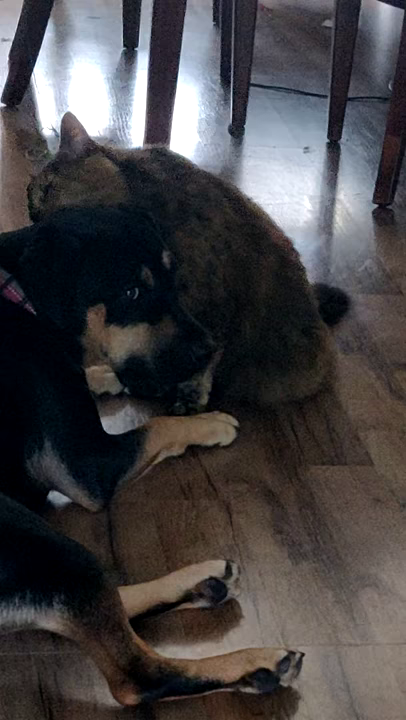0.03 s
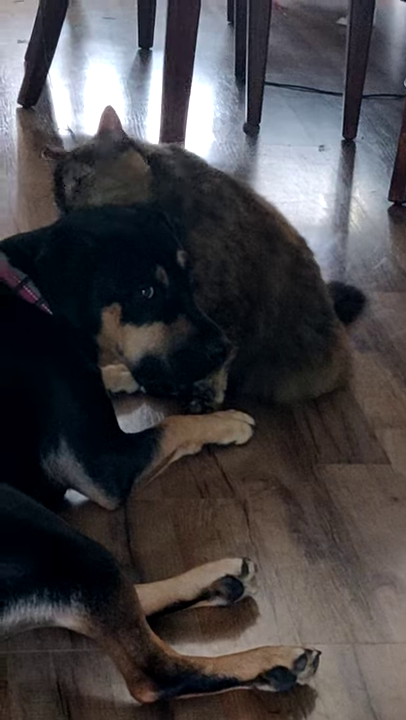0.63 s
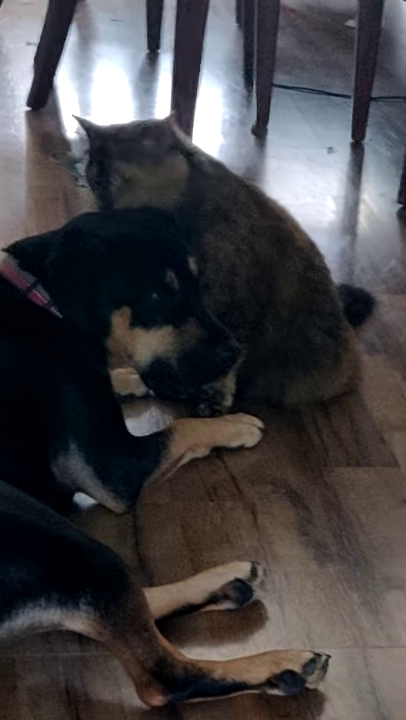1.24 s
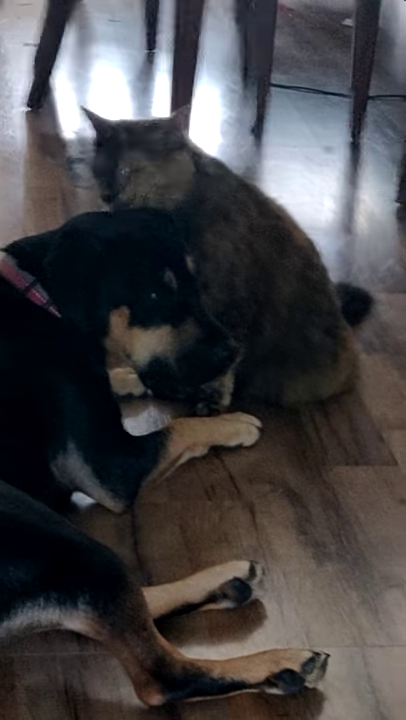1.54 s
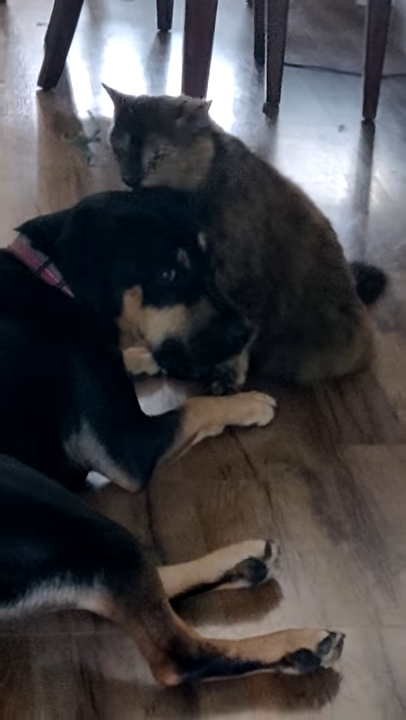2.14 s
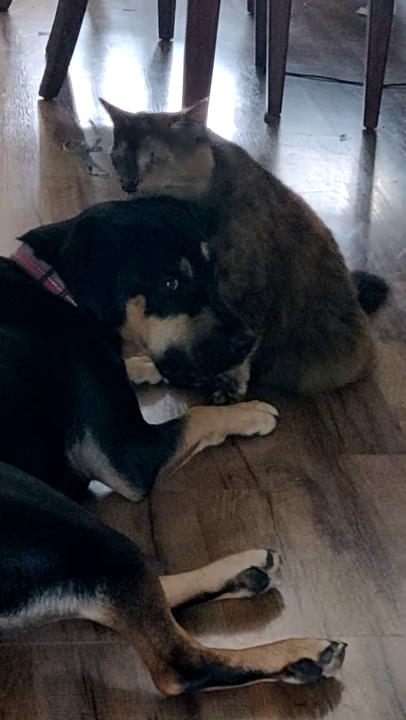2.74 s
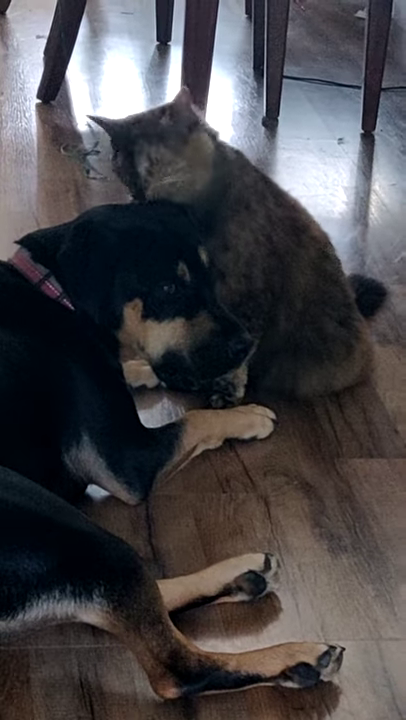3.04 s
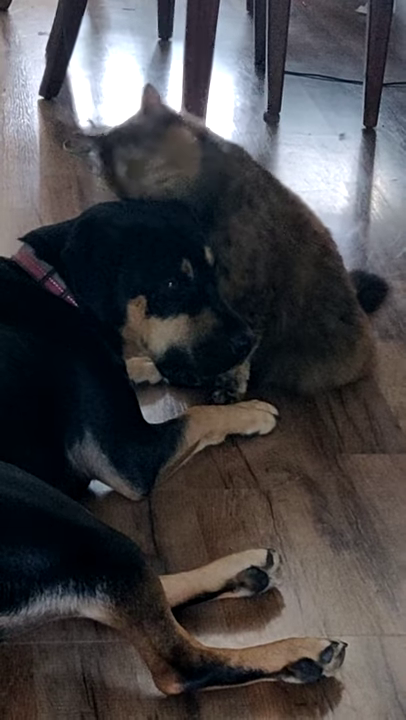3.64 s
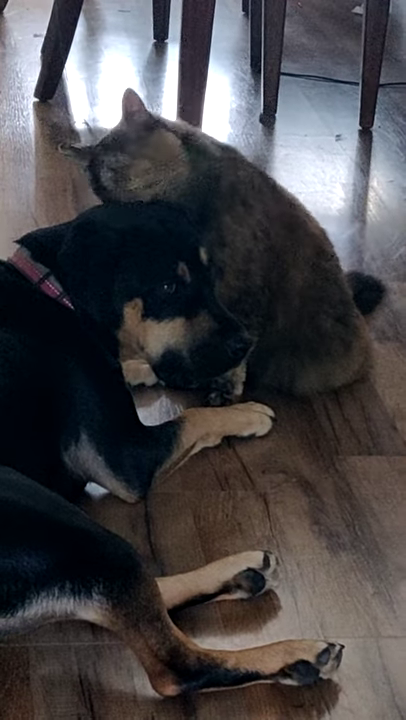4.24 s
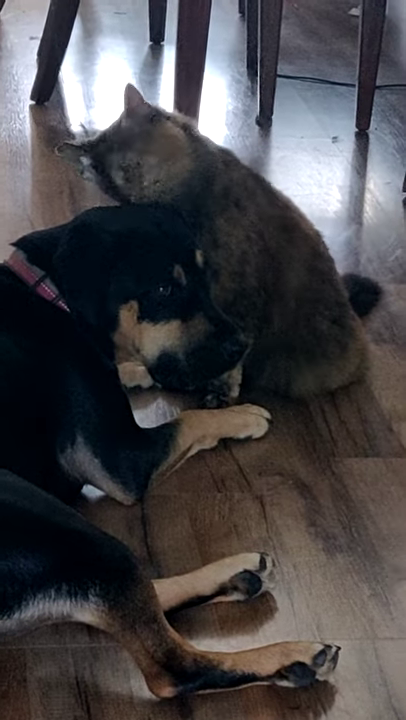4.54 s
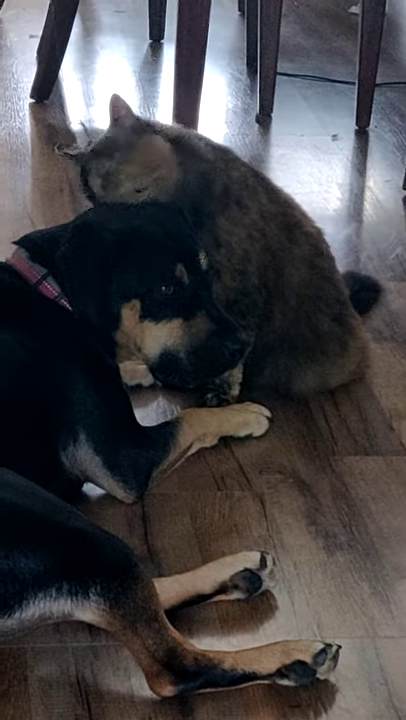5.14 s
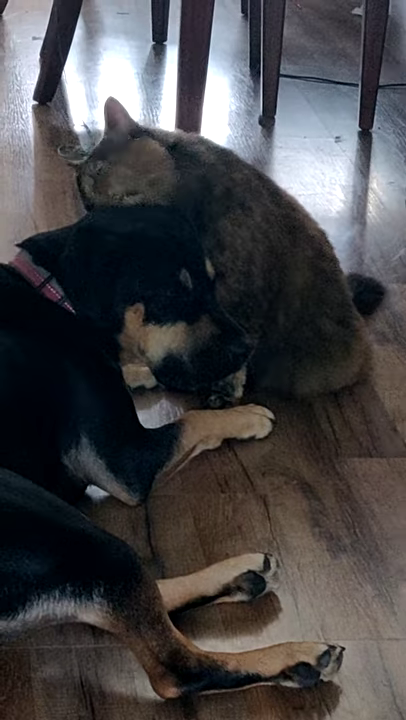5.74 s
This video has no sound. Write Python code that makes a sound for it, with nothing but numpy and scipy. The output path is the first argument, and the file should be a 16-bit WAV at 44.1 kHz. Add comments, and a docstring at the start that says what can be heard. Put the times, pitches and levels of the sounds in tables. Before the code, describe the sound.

A quiet room fades in at about 0.2 seconds, heard through a hand-held phone: rumbling ventilation, a faint wavering fan whine and microphone hiss, all of which stay to the end. From about 0.4 to 0.6 seconds a short low buzz shakes the left side. From around 0.9 seconds a cat and a dog shift on the wooden floor, slightly to the left, making very soft, brief scuffs that cluster between 1.6 and 2.4 seconds, with another near 3.1. Over the same stretch, until about 3.6 seconds, fingers lightly brush the phone on the right, and the grip changes with a soft, dull swell near 1.7 seconds. A claw taps the boards once with a scuff at 3.6 seconds. A last scuff follows at about 4.7 seconds, and one tiny dry tick sounds near 5.4 seconds over the steady rumble.

```python
"""A cat and a dog rest on a wooden floor in a quiet room, heard through a hand-held phone.
The sound fades in on rumbling ventilation, a faint fan whine and microphone hiss, which all stay.
As it does, a short low buzz shakes the left microphone opening. From about one second on, the
animals shift with soft scuffs, fingers brush the phone and the hand changes its grip.
Later a claw taps the floor, a last scuff follows, and there is one tiny tick near the end."""
import sys
import numpy as np
from scipy.fft import rfft, irfft, next_fast_len
from scipy.io import wavfile
from scipy.ndimage import map_coordinates

SR = 44100
rng = np.random.default_rng(int(sys.argv[2]) if len(sys.argv) > 2 else 0)


def bounce(signal):
    """Save signal as a 16-bit WAV file at the path given by the first command-line argument."""
    frames = np.transpose(np.atleast_2d(signal))
    limited = np.clip(frames, -1, 1)
    pcm = np.round(limited * 32767).astype(np.int16)
    wavfile.write(sys.argv[1], SR, pcm)


N = 259308
ANIMALS_LEFT_DB = 3.5  # the animals lie a little to the left


# The tone of rubbing on wood: pitch_hz, level_db
SCRAPE_TONE = [(500, -13), (2000, 17.5), (4000, 0), (6000, -5), (8000, -20), (15000, -24)]
# Each scuff: start_s, level_db, decay_s, pitch_hz, width_hz, high_ring_db
PAW_SCUFFS = [(0.868, -66, .008, 5700, 450, 16), (1.036, -69, .018, 5950, 450, 14),
              (1.643, -63.5, .036, 4600, 1500, 12), (1.868, -62, .012, 3700, 900, 3),
              (1.977, -63, .015, 4000, 700, 0), (2.345, -69, .018, 6100, 450, 16),
              (2.390, -63.5, 0.025, 2800, 1100, 21), (3.077, -68, .018, 6100, 450, 14),
              (3.597, -62.5, 0.075, 3700, 450, 14), (4.744, -61, 0.05, 2700, 1800, 11),
              (4.756, -65, 0.05, 4640, 700, 5)]

def scuffs(rise_s=0.0044, grain_db=1.5, ring_db=14, high_ring_hz=5840, high_ring_width_hz=950):
    """Paws and fur catch on the boards: a grainy rub with one strong pitch and a thin, high ring."""
    out = np.zeros((2, N))
    for start, db, decay, pitch, width, high_ring_db in PAW_SCUFFS:
        stroke = envelope(start, start, rise_s, decay)
        high_ring = lambda hz: amp(high_ring_db) * resonance(hz, high_ring_hz, high_ring_width_hz) ** 2
        ring = lambda hz: amp(ring_db) * resonance(hz, pitch, width) ** 2
        rub = noise(lambda hz: tone_curve(SCRAPE_TONE, hz) * (1 + high_ring(hz) + ring(hz)), channels=2)
        grain = amp(grain_db * wobble(300))
        out += amp(db) * stroke * unit(rub * grain)
    return pan(ANIMALS_LEFT_DB) * out


# The pitches a claw rings with: pitch_hz, width_hz, level_db
CLAW_RINGS = [(2100, 600, -7), (3600, 500, 0), (5600, 800, 1.5)]
# When the claw lands: start_s, level_db
CLAW_TAPS = [(3.5928, -55)]

def claw_tap(rise_s=0.0008, decay_s=0.005):
    """A claw tip strikes the boards once and rings for a few milliseconds."""
    tone = lambda hz: sum(amp(db) * resonance(hz, pitch, width) ** 2 for pitch, width, db in CLAW_RINGS)
    out = np.zeros((2, N))
    for start, db in CLAW_TAPS:
        ring = unit(noise(tone, channels=2))
        out += amp(db) * envelope(start, start, rise_s, decay_s) * ring
    return pan(ANIMALS_LEFT_DB) * out


# The tone of skin on the phone's case: pitch_hz, level_db
SKIN_TONE = [(1000, -2), (3500, 5.5), (7000, 1), (9700, 3), (12000, 1.5), (15500, 6.5)]
# Each finger stroke: start_s, length_s, relative_level_db, brightness_db_per_octave
FINGER_STROKES = [(0.93, .02, -69, 4), (1.040, .012, -61, 4), (1.635, .07, -62.5, 4), (1.75, 0.082, -63, 3),
                  (1.862, 0.032, -60, 1.5), (1.970, .025, -61, 5), (2.05, 0.081, -63, 1),
                  (2.355, 0.11, -66, 0), (3.075, .045, -66, 1), (3.400, .015, -61.5, 9),
                  (3.595, .04, -64.5, 2)]

def fingers(gain_db=-5, grain_db=2, rise_s=0.014, decay_s=0.03):
    """Skin slides on the case near the right microphone; quick flicks sound brighter."""
    out = np.zeros((2, N))
    for start, length, db, brightness in FINGER_STROKES:
        stroke = envelope(start, start + length, rise_s, decay_s)
        rub = noise(lambda hz: tone_curve(SKIN_TONE, hz) * amp(brightness * np.log2(hz + 1)), channels=2)
        out += amp(db) * stroke * unit(rub)
    grain = unit(amp(grain_db * wobble(250)))
    return amp(gain_db) * pan(left_db=-9) * out * grain


# When the hand presses: middle_s, level_db, half_length_s, pitch_hz
GRIP_SHIFTS = [(1.667, -52.5, 0.042, 400)]

def grip_shift(width_hz=70):
    """The hand changes its grip with a soft, dull swell, the same on both sides."""
    out = np.zeros((1, N))
    for middle, db, half_length, pitch in GRIP_SHIFTS:
        press = np.exp(-((clock() - middle) / half_length) ** 2 / 2)
        out += amp(db) * press * unit(noise(lambda hz: resonance(hz, pitch, width_hz) ** 2))
    return out


# When the tick comes: time_s, level_db
DRY_TICKS = [(5.4233, -46)]

def tick(decay_s=0.0004, dull_above_hz=5000):
    """A tiny dry tick: a very short snap of noise with its treble softened."""
    snap = sum(amp(db) * np.exp(-abs(clock() - time) / decay_s) for time, db in DRY_TICKS)
    return filtered(snap * rng.standard_normal((2, N)), lambda hz: 1 / np.hypot(1, hz / dull_above_hz))


def buzz(pitch_hz=46.2, start_s=0.388, end_s=0.586, rise_s=0.0087, decay_s=0.0076):
    """The phone's body shakes, heard only on the left: a weak tremble, then a short, low burst."""
    phase = 2 * np.pi * pitch_hz * clock()
    hum = np.sin(phase) + amp(-32) * np.sin(2 * phase)  # nearly pure, with a faint octave above
    tremble = amp(-42.5) * envelope(0, start_s, rise_s, decay_s)
    burst = amp(-25.5) * envelope(start_s, end_s, rise_s, decay_s)
    left = np.sqrt(2) * np.maximum(tremble, burst) * hum
    return np.array([left, np.zeros(N)])


# Moving air that reaches both microphones alike: pitch_hz, level_db_per_hz
SHARED_AIR = [(8, -85), (21, -75.5), (32, -79), (110, -72.5), (165, -85.5), (240, -77.5), (330, -83),
              (500, -84.5), (600, -89), (950, -89.5), (1350, -97.5), (1700, -96.5), (2100, -102),
              (2600, -103.3), (4500, -112.2), (12000, -130)]
# Air noise from the sides, pushing one microphone as it pulls the other: pitch_hz, level_db_per_hz
SIDE_AIR = [(8, -82), (35, -83.5), (170, -91.5), (230, -89), (460, -88), (600, -91.5), (930, -90),
            (1150, -95.5), (1700, -96.5), (2100, -103), (2600, -103.3), (4500, -111.7), (12000, -130)]
# Pitches the room rings at, alike at both microphones: pitch_hz, width_hz, level_db_per_hz
SHARED_ROOM_RINGS = [(36.2, 4.8, -63.5), (68.5, 1.8, -67.5), (102.3, 26.5, -70), (114.3, 9.8, -70),
                     (153.7, 12.3, -73.5), (190.3, 4.5, -68.5), (218, 16, -75.5), (246, 11, -79),
                     (302.4, 22, -80), (355.3, 7, -79), (380.6, 13, -74.5), (414.6, 7.2, -76.5),
                     (482, 14, -80), (517, 30, -84.5), (760, 21, -86), (804.4, 11.3, -80), (866, 15, -88),
                     (1215, 25, -95.5), (1558, 14, -96.5), (1700, 44, -99), (1860, 57, -100)]
# Narrow pitches of the room and one thin fan tone, opposite at the two microphones:
# pitch_hz, width_hz, level_db_per_hz
SIDE_PITCHES = [(77.7, 2.6, -74.5), (128, 13, -82.5), (705, 26, -92.5), (857, 8.5, -88), (950, 38, -92),
                (1008, 6.5, -82.5), (1170, 110, -95), (1580, 18, -92), (1690, 35, -94.5)]

def ventilation(waver_db=0.5, swell_db_per_s=0.18, bass_hz=324, bass_thin_db=-6, bass_full_s=0.38):
    """Flowing air rumbles in the room and swells very slowly; the bass comes in a moment late."""
    shared = room_air(SHARED_AIR, SHARED_ROOM_RINGS)
    side = room_air(SIDE_AIR, SIDE_PITCHES)
    swell_db = swell_db_per_s * (clock() - clock().mean())
    air = np.array([shared + side, shared - side]) * amp(swell_db + waver_db * wobble(7))
    bass = filtered(air, lambda hz: 1 / (1 + (hz / bass_hz) ** 4))
    bass_db = bass_thin_db * (1 - envelope(bass_full_s, N / SR, rise_s=0.05, decay_s=0.05))
    return air - bass + amp(bass_db) * bass


def room_air(rush, pitches):
    """A broad rush of air, plus narrow pitches that stand out from it."""
    def tone(hz):
        # the fourth power gives steep peaks with quiet gaps; 1.51 makes up for the narrowing
        peaks = sum(amp(db) ** 2 * resonance(hz, pitch, 1.51 * width) ** 4
                    for pitch, width, db in pitches)
        return np.sqrt(tone_curve(rush, hz) ** 2 + peaks)
    return noise(tone)[0]


# The tones in the fan's whine: pitch_hz, relative_level_db
FAN_TONES = [(949, -71), (1491, -82.5), (2271, -87), (2487, -85), (4313, -89.5)]

def fan(gain_db=-1, drift_hz=2.24, waver_db=2.5):
    """A fan whines with thin, wavering tones that reach each microphone by their own paths."""
    out = np.zeros((2, N))
    for pitch, db in FAN_TONES:
        phase = 2 * np.pi * np.cumsum(pitch + drift_hz * wobble(5)) / SR
        for side in out:
            strength = np.sqrt(2) * amp(db + gain_db + waver_db * wobble(3.43))
            side += strength * np.sin(phase + wobble(0.91))
    return out


# The microphones' own noise: pitch_hz, level_db_per_hz
HISS_TONE = [(100, -113), (5000, -114), (12000, -113), (14000, -113), (15700, -110.5)]

def hiss():
    """Each microphone makes its own faint, steady hiss."""
    return pan(left_db=-0.1) * noise(lambda hz: tone_curve(HISS_TONE, hz), channels=2)


# How the microphone openings ring, left then right: pitch_hz, width_hz, boost_db
OPENING_RINGS = [(6130, 750, 6), (9220, 1260, 5)]

def mic_openings(sound):
    """Each small opening rings at its own high pitch and boosts the sound there."""
    return filtered(sound, lambda hz: np.array([
        1 + (amp(db) - 1) * resonance(hz, pitch, width) ** 2 for pitch, width, db in OPENING_RINGS]))


def fade_in(start_s=0.164, first_share=0.058, settle_s=0.24, shut_db=-81, open_db=-0.16):
    """The input starts almost silent, opens at a low volume, rises quickly and levels off."""
    age = clock() - start_s
    rising = 1 - (1 - first_share) * np.exp(-np.maximum(age, 0) / settle_s)
    return amp(shut_db) + amp(open_db) * rising * (age > 0)


def amp(db):
    """Turn decibels into a number to multiply by."""
    return 10 ** (np.asarray(db) / 20)


def unit(x):
    """Scale a signal to an average strength (rms) of 1."""
    return x / np.sqrt(np.mean(x ** 2) + 1e-20)


def clock():
    """The time of every sample, in seconds."""
    return np.arange(N) / SR


def envelope(start_s, end_s, rise_s, decay_s):
    """Swell to 1 at start_s, hold until end_s, then die away."""
    t = clock()
    return np.exp(-np.maximum(start_s - t, 0) / rise_s - np.maximum(t - end_s, 0) / decay_s)


def wobble(turns_per_s):
    """A smooth curve through this many random values a second."""
    return map_coordinates(rng.standard_normal(int(N * turns_per_s / SR) + 4), [clock() * turns_per_s])


def tone_curve(points, hz):
    """Join (pitch_hz, level_db) points and read off the strength at each pitch."""
    pitches, db = np.transpose(points)
    return amp(np.interp(np.log(hz + 1), np.log(pitches + 1), db))


def resonance(hz, centre, width):
    """How strongly a ringing thing answers each pitch: 1 at its centre, less on either side."""
    return hz * width / np.hypot(centre ** 2 - hz ** 2, hz * width)


def filtered(x, tone):
    """Turn each pitch in x up or down by tone(hz)."""
    size = next_fast_len(N + 8192)
    return irfft(rfft(x, size) * tone(np.fft.rfftfreq(size, 1 / SR)), size)[..., :N]


def noise(tone, channels=1):
    """Noise shaped by tone(hz), different in each channel."""
    return filtered(rng.standard_normal((channels, N)) * np.sqrt(SR / 2), tone)


def pan(left_db):
    """Left and right strengths that make the left side louder by left_db."""
    return amp([[left_db / 2], [-left_db / 2]])


def scene():
    """The steady room, with the small sounds of the animals and the phone on top."""
    return ventilation() + fan() + scuffs() + claw_tap() + fingers() + grip_shift() + tick() + buzz()


def record(dry):
    """The microphones hiss, their openings ring, the sound fades in and the very top is cut off."""
    heard = mic_openings(dry + hiss()) * fade_in()
    return filtered(heard, lambda hz: hz < 15750)


dry = scene()
out = record(dry)
bounce(out)
```